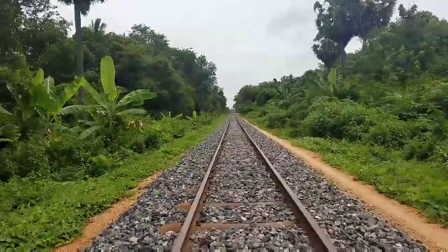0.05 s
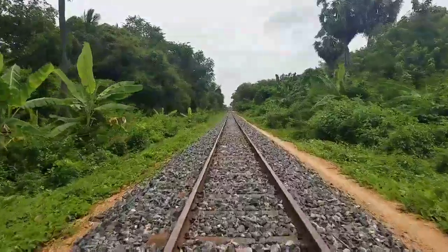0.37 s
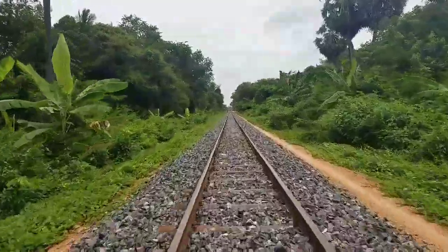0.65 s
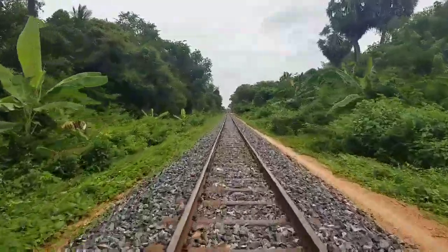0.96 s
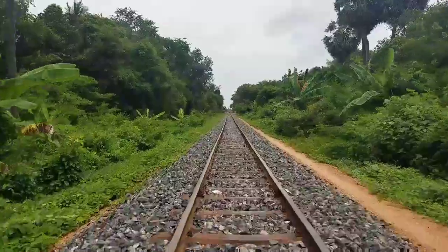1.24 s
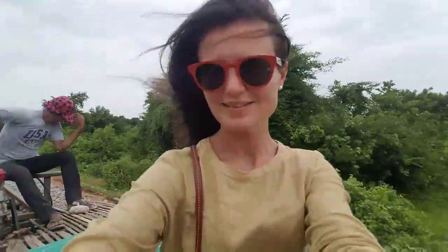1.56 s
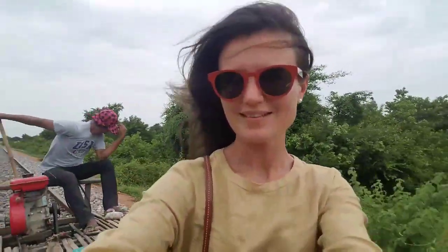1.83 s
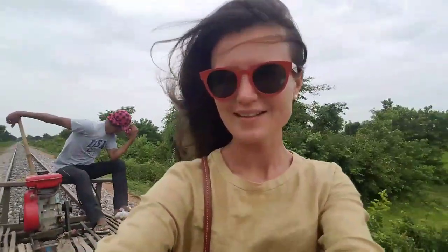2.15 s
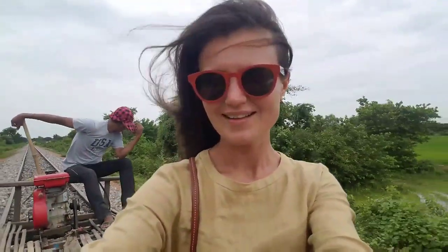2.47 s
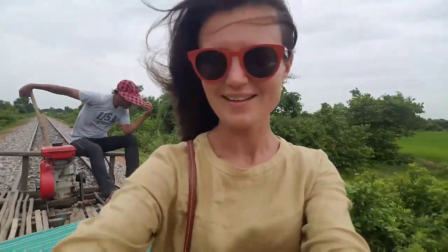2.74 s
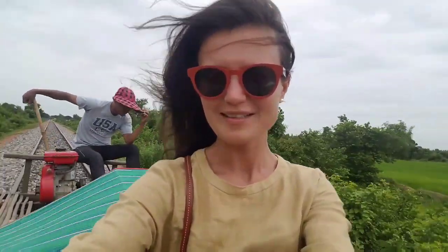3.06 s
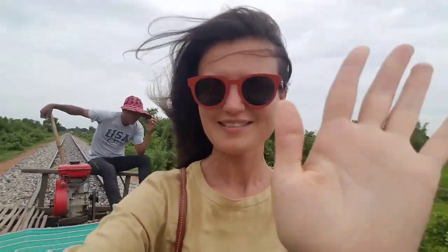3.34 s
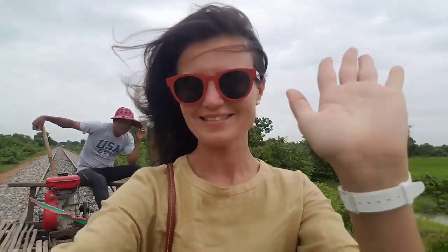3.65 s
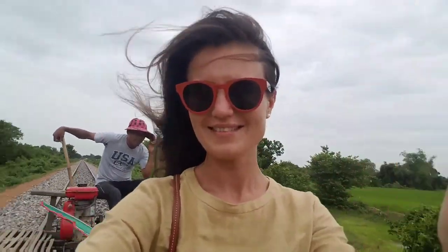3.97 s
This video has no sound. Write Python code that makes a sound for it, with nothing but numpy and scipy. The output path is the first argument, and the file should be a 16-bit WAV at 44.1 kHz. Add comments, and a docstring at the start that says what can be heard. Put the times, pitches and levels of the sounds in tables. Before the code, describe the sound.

A small engine-driven rail cart rumbles and clacks along a track, heard from on board.

```python
"""Riding a small rail cart

An engine-driven cart, heard from on board in two stretches: the first fades out, the second cuts in
nearer the engine. Worn wheels roar, knock with every turn and ring the steel; one cylinder thuds and
booms in the deck. Rail joints clack, grit and fittings tick, and wind buffets the microphone.
In the second stretch the flanges grind on the rail and a loose metal part jingles."""
import sys
import numpy as np
from scipy import signal
from scipy.fft import rfft, irfft
from scipy.io import wavfile

SR = 44100
rng = np.random.default_rng(int(sys.argv[2]) if len(sys.argv) > 2 else 0)


def dump_mix(stems):
    """Bounce the given channels to the path in sys.argv[1] as a 16-bit WAV at rate SR."""
    frames = np.atleast_2d(stems).T  # one column per channel
    limited = np.clip(frames, -1, 1)  # hard clip at full scale
    pcm = np.round(limited * 32767).astype(np.int16)
    wavfile.write(sys.argv[1], SR, pcm)


N = 176400
T = np.arange(N) / SR
FADE_END_S, CUT_IN_S, CUT_RISE_S = 1.29, 1.336, 0.017  # first stretch ends; second starts and rises


def amp(db):
    return 10 ** (np.asarray(db) / 20)


def unit(x):
    """Scales to an rms of 1."""
    return x / np.sqrt(np.mean(x ** 2) + 1e-20)


def read(points, hz):
    """Reads a table over log frequency."""
    f, value = np.transpose(points)
    return np.interp(np.log(hz + 1), np.log(f + 1), value)


def colour(x, points):
    """Equalises by a table of frequency in Hz and gain in dB."""
    return irfft(rfft(x) * amp(read(points, np.fft.rfftfreq(N, 1 / SR))), N)


def drift(hz):
    """A smooth random wander, moving up to about hz times a second."""
    times = T[::32]
    f = np.fft.rfftfreq(len(times), times[1])
    slow = irfft(rfft(rng.standard_normal(len(times))) / (1 + (f / hz) ** 4), len(times))
    return np.interp(T, times, unit(slow))


def ring(x, hz, width_hz):
    """One resonance, applied twice for steep sides."""
    pole = np.exp((2j * hz - width_hz) * np.pi / SR)
    return unit(signal.lfilter([1], [1, -2 * pole, pole ** 2], x).real)


def blow(age, rise_s, decay_s):
    """The envelope of a hit: quick attack, exponential decay."""
    out, live = np.zeros(N), (age > 0) & (age < 10 * decay_s)
    out[live] = (1 - np.exp(-age[live] / rise_s)) * np.exp(-age[live] / decay_s)
    return out


def surge(start_s, length_s):
    """The envelope of a swell: half a sine wave."""
    return np.sin(np.pi * np.clip((T - start_s) / length_s, 0, 1))


def rattle(per_s, spread_db):
    """Sparse small impacts of slats and fittings, of very unequal size."""
    hits = (rng.random(N) < per_s / SR) * amp(spread_db * np.minimum(rng.exponential(1, N), 3))
    t = np.arange(SR // 100) / SR
    burst = rng.standard_normal((2, len(t))) * np.exp(-t / 0.00072)
    return unit(signal.oaconvolve(hits * rng.standard_normal((2, N)), burst, axes=1)[:, :N])


# The knocks of a worn wheel. Each row: place in the turn from 0 to 1, relative strength.
WHEEL_KNOCKS = [(0.233, 1.0), (.52, 0.65), (.66, 0.27), (.94, 0.13)]

def tread(turns_hz, knock, decay_s, flutter_db, flutter_hz, repeat):
    """Wheel on rail: roughness that partly repeats with each turn and swells at every knock."""
    turn = T * turns_hz
    knocks = sum(size * blow((turn - place) % 1 / turns_hz, 0.0045, decay_s)
                 for place, size in WHEEL_KNOCKS)
    worn = rng.standard_normal((2, SR))[:, (turn % 1 * SR / turns_hz).astype(int)]
    rough = np.sqrt(repeat) * worn + np.sqrt(1 - repeat) * rng.standard_normal((2, N))
    return rough * (1 + knock * knocks) * amp(flutter_db * drift(flutter_hz))


# Faders for the rolling bed. Each row: time in seconds, then rumble, clatter and hiss in dB before trim.
FIRST_ROLL = [(0, -17, -25.5, -47.5), (.2, -19, -25.5, -43.5), (.4, -17.5, -28.5, -46),
              (.68, -21.5, -30, -49), (.8, -23.5, -34, -51.5), (.93, -25.5, -37, -54),
              (1.02, -29.5, -36.5, -57), (1.15, -30, -41.5, -58), (1.28, -44.5, -51.5, -69)]
SECOND_ROLL = [(1.37, -15.5, -18, -39.5), (1.57, -12.5, -19.5, -41), (1.63, -13.5, -22, -40),
               (1.7, -14.5, -21.5, -41.5), (1.8, -14.5, -20, -42), (1.92, -15, -19.5, -39),
               (2.01, -15.5, -20.5, -41), (2.05, -15.5, -23.5, -38.5), (2.14, -13.5, -19, -40),
               (2.23, -12.5, -18.5, -40), (2.36, -13.5, -21.5, -40.5), (2.52, -14, -21, -40.5),
               (2.6, -16, -20.5, -41), (2.77, -14, -20, -41.5), (2.86, -11.5, -20, -40),
               (3.01, -15, -20.5, -40), (3.2, -12.5, -23, -42), (3.32, -14, -19.5, -42),
               (3.55, -15.5, -22.5, -40.5), (3.74, -14.5, -22, -39.5), (3.85, -16, -23, -43.5),
               (4, -17.5, -27, -45.5)]
# The tone of the roar. Each row: frequency in Hz, relative gain in dB.
FIRST_EQ = [(30, -32), (90, -18.5), (150, -14), (210, -3.5), (270, -5.5), (330, -5), (430, -7.5),
            (530, -14), (650, -22), (780, -16), (880, -23.5), (980, -17), (1400, -24), (2000, -28),
            (2500, -29), (3300, -35), (5000, -40), (7500, -47.5), (11000, -51), (15800, -55)]
SECOND_EQ = [(30, -28), (90, -17), (135, -11.5), (175, -4), (230, 0), (260, -6), (320, -4), (450, -9),
             (700, -11.5), (860, -15), (1080, -15.5), (1500, -20.5), (2000, -24), (2650, -26.5),
             (3300, -31.5), (4100, -34.5), (5000, -40), (7000, -46), (8000, -45.5), (9800, -51),
             (11200, -49), (14000, -54), (15800, -51)]
# Its stereo width. Each row: frequency in Hz, left-right likeness (1 or more alike, -1 opposite).
FIRST_LIKENESS = [(60, -1), (130, 1.13), (290, 0.8), (640, 0.96), (1400, -0.03), (3000, 0), (15000, 0)]
SECOND_LIKENESS = [(60, -0.29), (130, 0.47), (220, 0.82), (640, 0.71), (1400, 0.032), (2600, -0.45),
                   (6000, 0.069), (15000, -0.11)]
# Its panning. Each row: frequency in Hz, left minus right in dB.
FIRST_PAN = [(80, -16.5), (170, -2), (260, -1.5), (400, -3), (700, -1), (2500, 0), (4000, -4), (9000, -0.5),
             (15000, 1)]
SECOND_PAN = [(80, -2.5), (200, 0), (260, -2.5), (340, -1), (1000, -1), (2500, -5), (4000, -7),
              (9000, -4.5), (14000, -2.5)]
RUMBLE_TOP_HZ, CLATTER_TOP_HZ = 518, 3940

def rolling(levels, eq, likeness, pan, turns_hz, knock, right_lead_rad, trims_db):
    """The wheels drive the frame in three bands: low rumble, rattling clatter and rail hiss."""
    f = np.fft.rfftfreq(N, 1 / SR)
    low = 1 / (1 + (f / RUMBLE_TOP_HZ) ** 8)
    top = 1 - 1 / (1 + (f / CLATTER_TOP_HZ) ** 8)
    bands = np.sqrt([low, np.maximum(1 - low - top, 0), top])
    taps = rattle(per_s=420, spread_db=1.0)
    rumble = tread(turns_hz, knock * 0.45, decay_s=0.014, flutter_db=1.0, flutter_hz=59.6, repeat=0.25)
    clatter = tread(turns_hz, knock * 0.6, decay_s=0.015, flutter_db=1.07, flutter_hz=130, repeat=0.053)
    hiss = tread(turns_hz, knock * 1.5, decay_s=0.0068, flutter_db=1.17, flutter_hz=70, repeat=0.02)
    drives = [unit(rumble) + 0.21 * taps, unit(clatter) + 0.5 * taps, unit(hiss) + 0.26 * taps]
    alike, lean = np.clip(read(likeness, f), -1, 1), amp(read(pan, f) / 2)
    times, *faders = np.transpose(levels)
    out = np.zeros((2, N))
    for drive, band, fader, trim_db in zip(drives, bands, faders, trims_db):
        left, other = rfft(drive) * band * amp(read(eq, f))
        right = (alike * left + np.sqrt(1 - alike ** 2) * other) * np.exp(1j * right_lead_rad * low)
        pair = irfft(np.array([left * lean, right / lean]), N)
        out += pair / pair.mean(0).std() * amp(np.interp(T, times, fader) + trim_db)
    return out


# Faders for the engine. Each row: time in seconds, relative level in dB.
FIRST_ENGINE = [(0, -14.5), (.25, -17.5), (.35, -29), (.53, -20.5), (.75, -29.5), (1.0, -29.5), (1.28, -48)]
SECOND_ENGINE = [(1.37, -26.5), (1.52, -24), (1.62, -16), (1.74, -19), (1.83, -22), (2.25, -36),
                 (2.35, -19.5), (2.5, -13.5), (2.78, -21), (2.95, -15.5), (3.2, -16.5), (3.45, -19),
                 (3.65, -27), (3.9, -17), (4, -30)]
# The bark of the exhaust. Each row: frequency in Hz, relative gain in dB.
BARK_EQ = [(40, -47), (150, 0.5), (330, -3), (600, -8.5), (1200, -26), (3000, -28), (9000, -64)]
FIRINGS_HZ = 25.8

def engine(levels, boom_hz, width_hz, boom_db, hum_db, bark_db, right_lead_rad):
    """Uneven firings of one cylinder boom in the exhaust and deck; the harmonic nearest the boom hums."""
    cycle = np.cumsum(FIRINGS_HZ * (1 + 0.009 * drift(5))) / SR
    firings = unit(np.diff(np.floor(cycle), prepend=0) * (1 + 0.33 * rng.standard_normal(N)))
    puffs = unit(np.exp(-(cycle % 1) / 0.16) * rng.standard_normal(N))
    boom = ring(firings + 0.47 * puffs, boom_hz, width_hz)
    harmonic = np.round(boom_hz / FIRINGS_HZ)
    hum = unit(np.sin(2 * np.pi * harmonic * cycle) * amp(2.0 * drift(15)))
    bark = unit(colour(firings + 0.71 * puffs, BARK_EQ))
    left = amp(boom_db) * boom + amp(hum_db) * hum + amp(bark_db) * bark
    left *= amp(np.interp(T, *np.transpose(levels)))
    return np.array([left, irfft(rfft(left) * np.exp(1j * right_lead_rad), N)])


# The ring of the steel wheels and frame. Each row: pitch in Hz, width in Hz, relative level in dB.
STEEL_MODES = [(496, 34, -2.5), (689, 114, -5), (952, 110, -1), (1153, 93, -3), (1402, 250, -4.5),
               (1660, 270, -8), (2465, 140, -11.5), (2866, 220, -10.5), (4060, 770, -26)]

def steel(levels, turns_hz, trim_db, swell_db):
    """Wheel knocks ring the steel, riding the clatter fader; each resonance swells and fades by itself."""
    times, _, clatter_db, _ = np.transpose(levels)
    drive = tread(turns_hz, knock=2.1, decay_s=0.022, flutter_db=3.5, flutter_hz=40, repeat=0.08)
    out = np.zeros((2, N))
    for hz, width_hz, db in STEEL_MODES:
        left, other = ring(drive * amp(swell_db * drift(13.5)), hz, width_hz)
        alike = 1 / (1 + (hz / 1300) ** 4)  # high rings spread wider
        out += amp(db) * np.array([left, alike * left + np.sqrt(1 - alike ** 2) * other])
    return unit(out) * amp(np.interp(T, times, clatter_db) + trim_db) * amp([[-1.5], [1.5]])


# The crackle of grit. Each row: frequency in Hz, relative gain in dB.
GRIT_EQ = [(500, -25), (1500, -6), (3000, 0), (5000, -4), (8000, -8), (15000, -16)]

def grit(levels, trim_db):
    """Grit and loose slats tick at random, riding the hiss fader."""
    times, _, _, hiss_db = np.transpose(levels)
    crackle = unit(colour(rattle(per_s=70, spread_db=3.5), GRIT_EQ))
    return crackle * amp(np.interp(T, times, hiss_db) + trim_db)


# Hits on rail joints. Each row: start in seconds, clack level in dB, deck thump level in dB.
JOINT_HITS = [(0.026, -19, -27), (0.057, -45, -15), (0.124, -26, -19), (.226, -16, -6), (.497, -28, -27),
              (1.373, -16, -25), (1.545, -18, -27), (1.764, -17.5, -9), (2.005, -18, -31),
              (2.55, -16.5, -11), (2.883, -16, -26), (3.394, -21, -1), (3.412, -11.5, -3),
              (3.645, -19.5, -15)]
# The tone of the clack. Each row: frequency in Hz, relative gain in dB.
CLACK_EQ = [(60, -75), (200, -8.5), (400, 13.5), (1000, 2), (2000, -3.5), (3000, -9), (6000, -16.5),
            (11000, -25.5), (15800, -32)]

def rail_joints():
    """Wheels strike rail joints: the frame clacks and the deck thumps."""
    level = sum(amp(db) * blow(T - start, 0.0017, 0.02) for start, db, _ in JOINT_HITS)
    centre = rng.standard_normal(N)
    noise = unit(colour(rng.standard_normal((2, N)) + 0.59 * centre, CLACK_EQ))
    out = noise * level * amp([[-1.5], [1.5]])
    for start, _, thump_db in JOINT_HITS:
        age, thump_hz = T - start, 302 * rng.uniform(0.93, 1.15)
        out += amp(thump_db) * blow(age, 0.0039, 0.0097) * np.sin(2 * np.pi * thump_hz * age)
    return out


# Sharp ticks of loose fittings. Each row: start in seconds, level in dB.
FITTING_TICKS = [(.061, -26), (.135, -29), (0.23, -22.5), (0.503, -27.5), (.7, -36), (.805, -38),
                 (1.711, -32), (2.131, -25), (2.42, -23.5), (2.453, -23), (3.314, -25), (3.428, -20)]
# Their bright snap. Each row: frequency in Hz, relative gain in dB.
TICK_EQ = [(300, -25), (1200, -17), (2900, 6.5), (4300, 2), (6500, -12.5), (15000, -18)]

def fittings():
    """Loose fittings snap against the frame."""
    level = sum(amp(db) * blow(T - start, 0.0012, 0.0091) for start, db in FITTING_TICKS)
    return unit(colour(rng.standard_normal((2, N)), TICK_EQ)) * level * amp([[-1], [1]])


# Buffets of wind. Each row: start in seconds, length in seconds, level in dB.
WIND_BUFFETS = [(0.334, 0.11, -22), (1.634, 0.16, -26), (1.97, .16, -21.5), (2.54, 0.11, -31),
                (3.207, 0.077, -20)]
# Their bassy weight. Each row: frequency in Hz, relative gain in dB.
WIND_EQ = [(15, -23), (40, -9), (80, 6.5), (130, 3.5), (250, -20), (800, -48), (4000, -80)]

def wind(bed_db):
    """Lumpy low turbulence, different at each microphone port; a soft bed joins in the second stretch."""
    bed = amp(bed_db + 3 * drift(6)) * (T > CUT_IN_S)
    buffets = sum(amp(db) * surge(start, length) ** 2 for start, length, db in WIND_BUFFETS)
    return unit(colour(rng.standard_normal((2, N)), WIND_EQ)) * (bed + buffets) * amp([[1], [-1]])


# Flange grinds. Each row: start in seconds, length in seconds, body level in dB, high rasp level in dB.
FLANGE_GRINDS = [(1.342, 0.26, -28.5, -37), (1.74, 0.11, -24, -41), (1.97, .06, -23.5, -51),
                 (2.13, .15, -30, -44), (2.523, 0.15, -28, -48), (2.899, .05, -23, -32),
                 (2.971, 0.078, -25.5, -42)]
# The body of the grind. Each row: frequency in Hz, relative gain in dB.
GRIND_EQ = [(200, -30), (600, -6), (1050, 0), (1450, -1), (2000, -9), (2800, -8), (4500, -20), (9000, -36),
            (16000, -50)]

def flanges():
    """A wheel flange rubs the rail in rough, sticking surges."""
    rub = rattle(per_s=900, spread_db=4)
    body = unit(colour(rub + 0.3 * rub[::-1], GRIND_EQ))  # crossfeed narrows the image
    rasp = ring(rub, hz=2560, width_hz=220)
    sound = sum((amp(body_db) * body + amp(rasp_db) * rasp) * surge(start, length)
                for start, length, body_db, rasp_db in FLANGE_GRINDS)
    return sound * amp([[-1.5], [1.5]])


# Shakes of a loose metal part. Each row: start in seconds, level in dB before panning.
JINGLE_SHAKES = [(1.631, -40), (1.72, -39), (1.8, -44), (1.88, -39), (1.96, -39), (2.025, -35), (2.12, -39),
                 (2.21, -44), (2.3, -42), (2.37, -39), (2.42, -41), (2.47, -43), (2.56, -43), (2.89, -40),
                 (3.14, -46), (3.31, -47), (3.42, -47)]
# Its shimmer. Each row: frequency in Hz, relative gain in dB.
JINGLE_EQ = [(7000, -36), (11000, -8), (13000, -17), (14300, -13), (14770, 0), (15050, -4), (15350, -3),
             (15900, -9)]

def jingle():
    """A loose metal part rings very high, to the right."""
    level = sum(amp(db) * blow(T - start, 0.0082, 0.055) for start, db in JINGLE_SHAKES)
    return unit(colour(rng.standard_normal((2, N)), JINGLE_EQ)) * level * amp([[-11], [2]])


def scene():
    """The two stretches, with a moment of silence between them."""
    first_turns_hz, second_turns_hz = 11.1, 11.86  # wheel speed
    first = rolling(FIRST_ROLL, FIRST_EQ, FIRST_LIKENESS, FIRST_PAN, first_turns_hz,
                    knock=0.26, right_lead_rad=-0.076, trims_db=(0.5, 0.04, 0.6))
    first += engine(FIRST_ENGINE, boom_hz=271.3, width_hz=31,
                    boom_db=-3.5, hum_db=-10.5, bark_db=-17.5, right_lead_rad=-0.16)
    first += steel(FIRST_ROLL, first_turns_hz, trim_db=-8.5, swell_db=6.0)
    second = rolling(SECOND_ROLL, SECOND_EQ, SECOND_LIKENESS, SECOND_PAN, second_turns_hz,
                     knock=1.3, right_lead_rad=0.63, trims_db=(-0.53, -1.13, 0.85))
    second += engine(SECOND_ENGINE, boom_hz=204, width_hz=69,
                     boom_db=-6.0, hum_db=-3.5, bark_db=-9, right_lead_rad=0.79)
    second += steel(SECOND_ROLL, second_turns_hz, trim_db=-6.5, swell_db=2.3)
    first += grit(FIRST_ROLL, trim_db=-5.5)
    second += grit(SECOND_ROLL, trim_db=-8)
    accents = rail_joints() + flanges() + fittings() + jingle() + wind(bed_db=-37)
    first_gate = np.clip((FADE_END_S - T) / 0.0059, 0, 1)
    second_gate = np.clip((T - CUT_IN_S) / CUT_RISE_S, 0, 1)
    return first_gate * (first + accents) + second_gate * (second + accents)


def record(dry):
    """Soft overload at full scale, then a steep cut of the highest treble."""
    limited = dry / (1 + dry ** 8) ** (1 / 8)
    lowpass = signal.firwin(1023, cutoff=15880, window=("kaiser", 9), fs=SR)
    return signal.oaconvolve(limited, lowpass[None], "same")


dry = scene()
out = record(dry)
dump_mix(out)
```